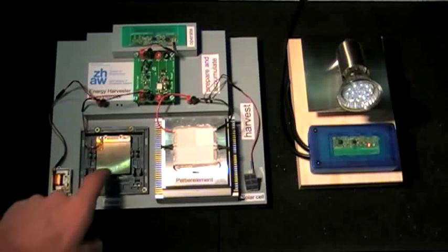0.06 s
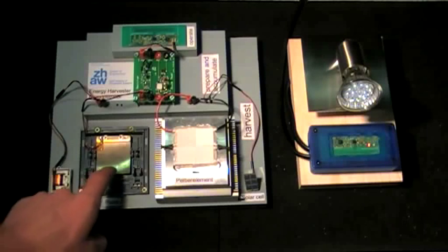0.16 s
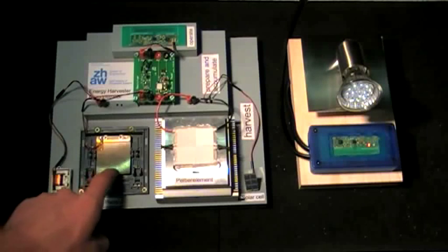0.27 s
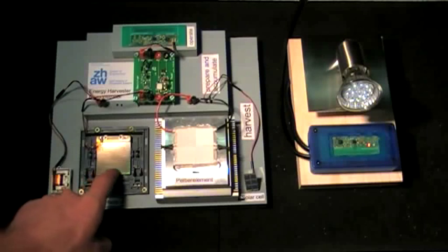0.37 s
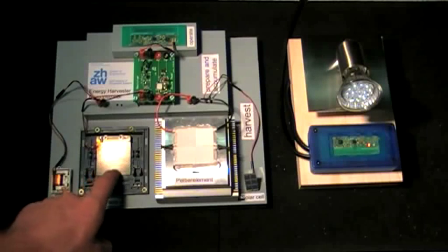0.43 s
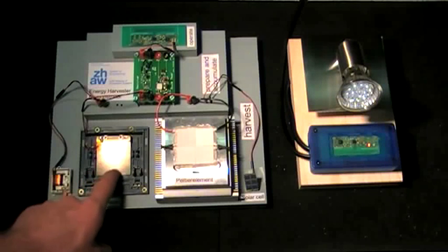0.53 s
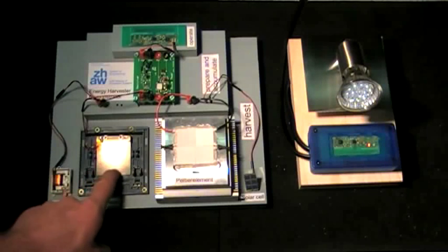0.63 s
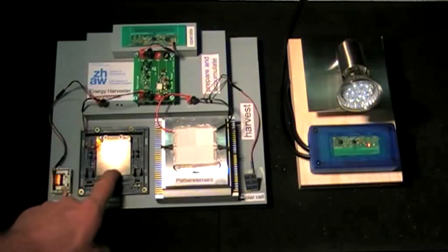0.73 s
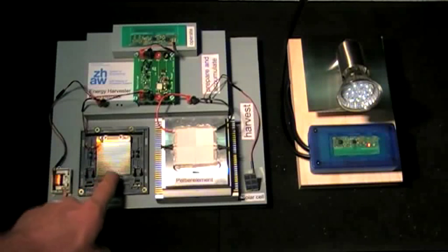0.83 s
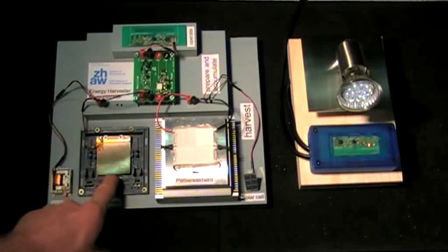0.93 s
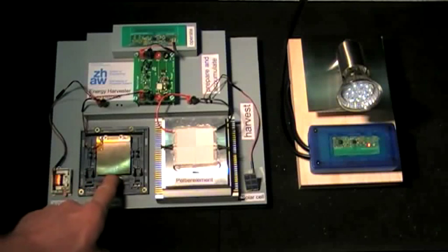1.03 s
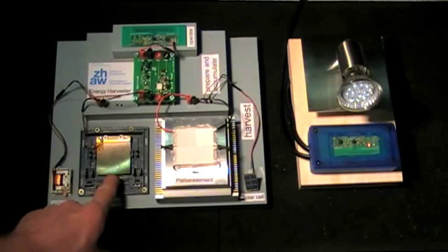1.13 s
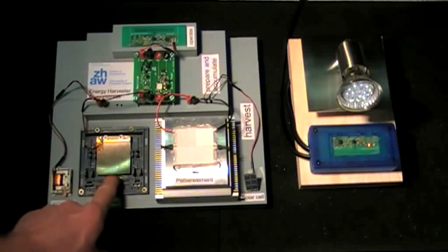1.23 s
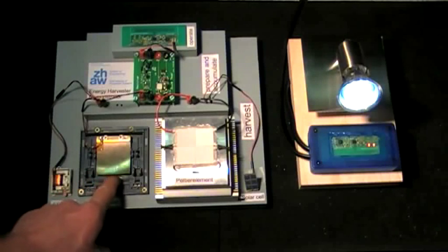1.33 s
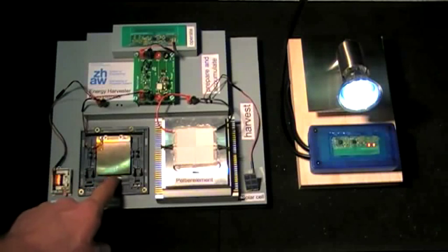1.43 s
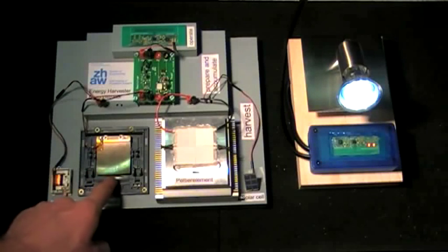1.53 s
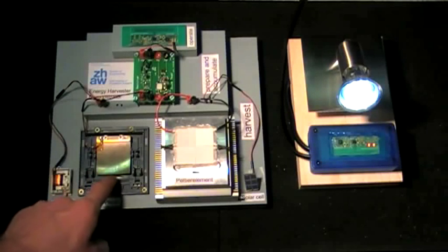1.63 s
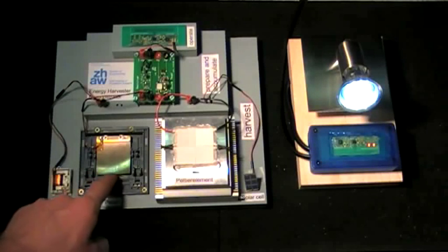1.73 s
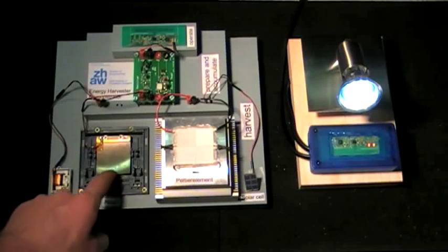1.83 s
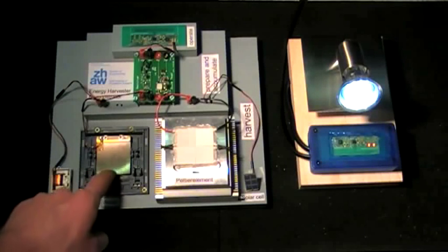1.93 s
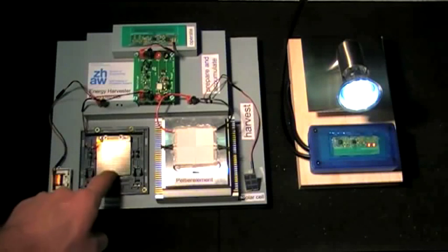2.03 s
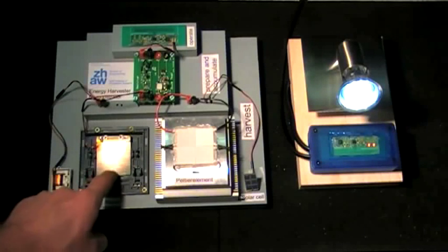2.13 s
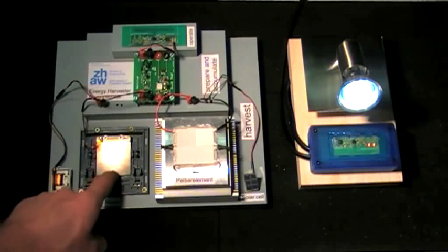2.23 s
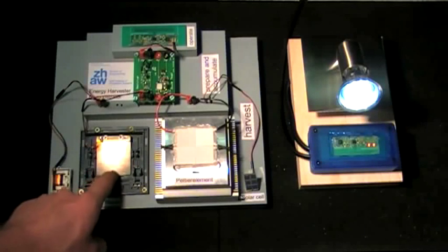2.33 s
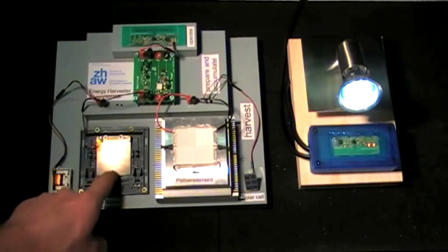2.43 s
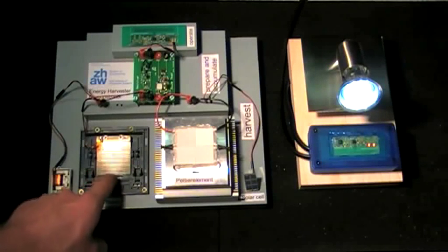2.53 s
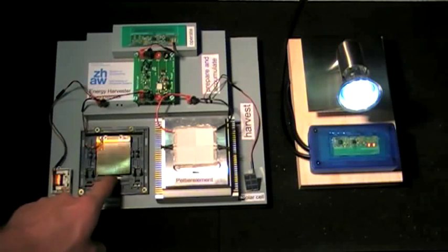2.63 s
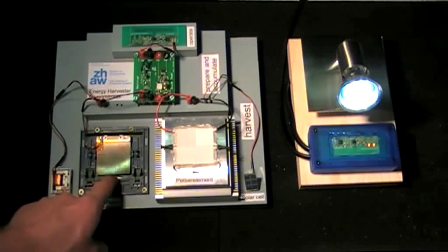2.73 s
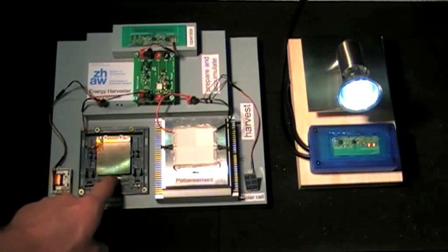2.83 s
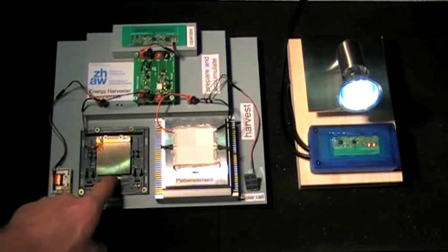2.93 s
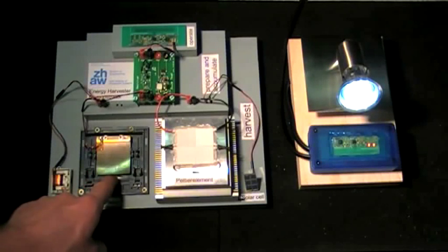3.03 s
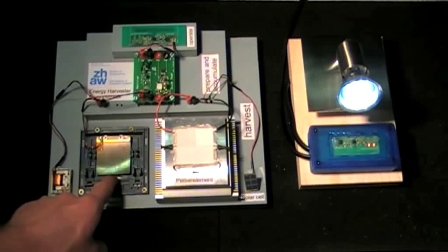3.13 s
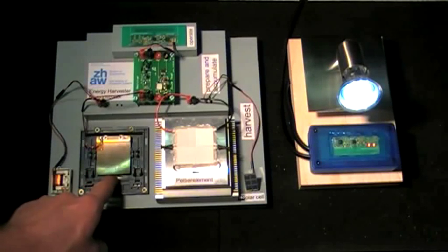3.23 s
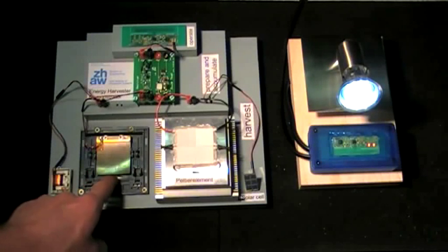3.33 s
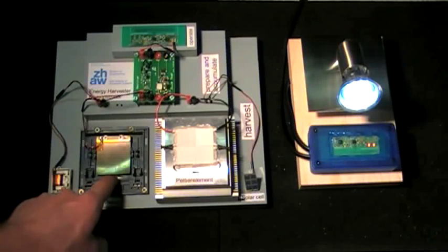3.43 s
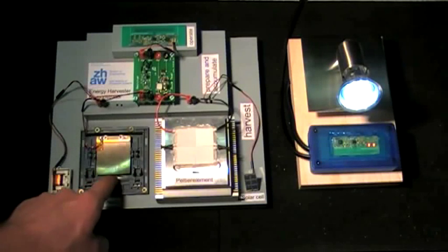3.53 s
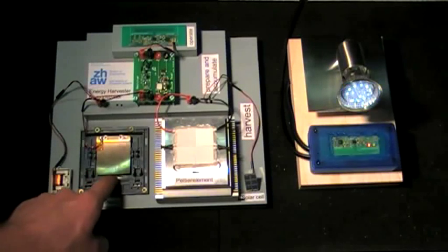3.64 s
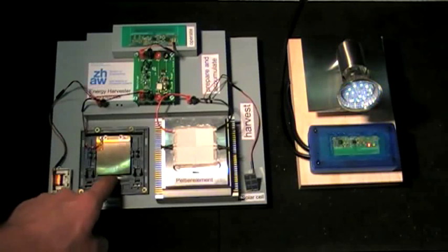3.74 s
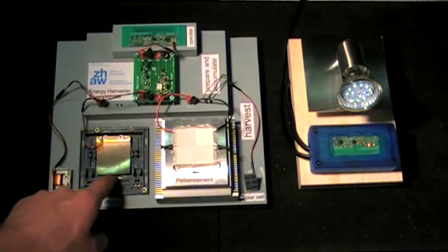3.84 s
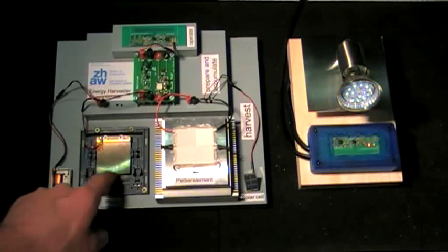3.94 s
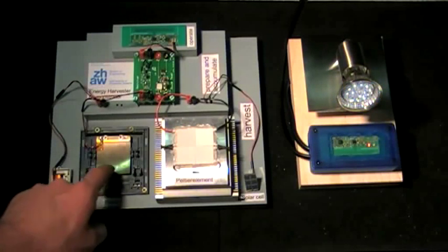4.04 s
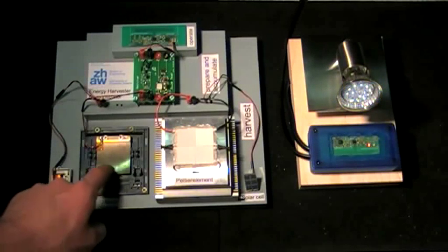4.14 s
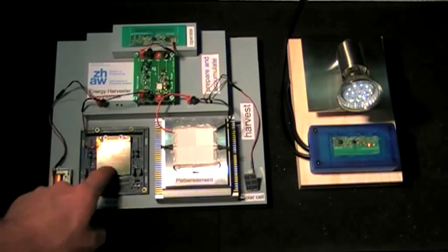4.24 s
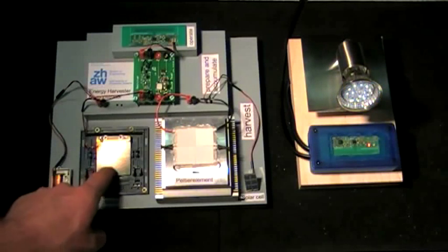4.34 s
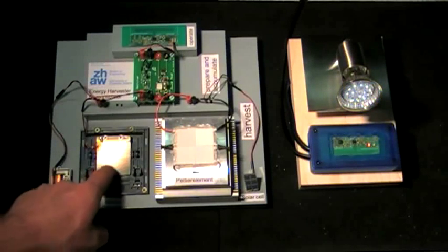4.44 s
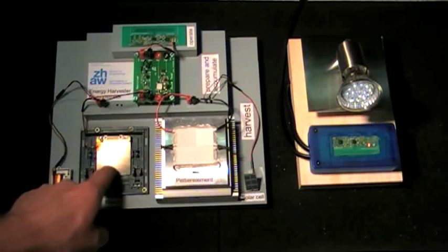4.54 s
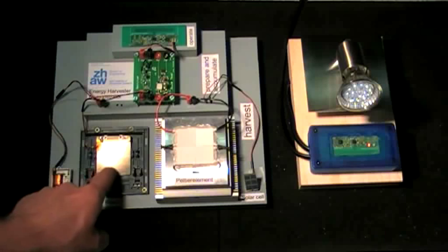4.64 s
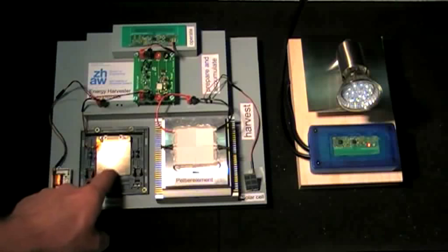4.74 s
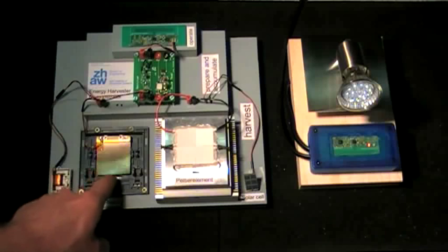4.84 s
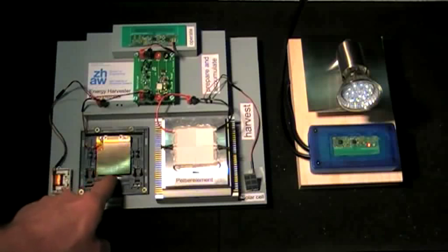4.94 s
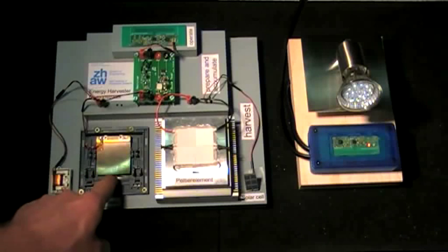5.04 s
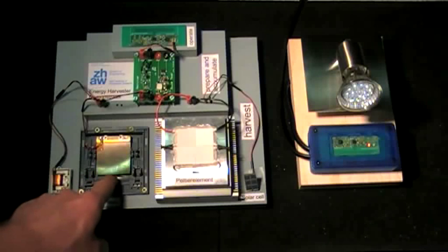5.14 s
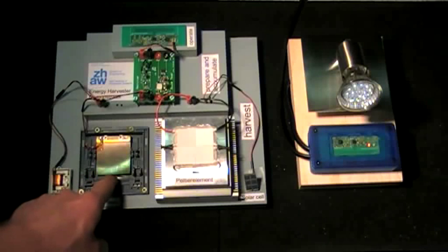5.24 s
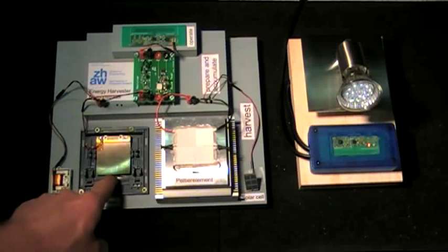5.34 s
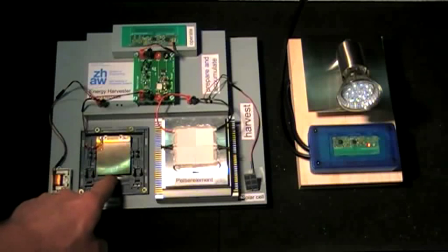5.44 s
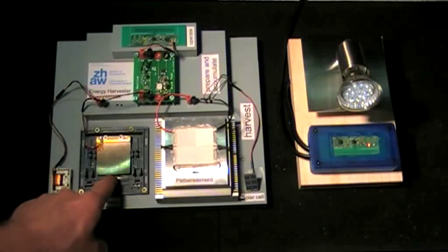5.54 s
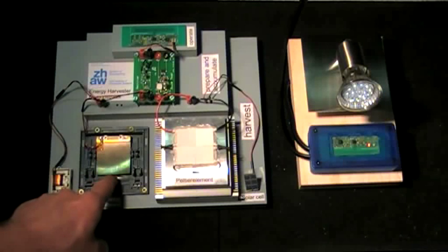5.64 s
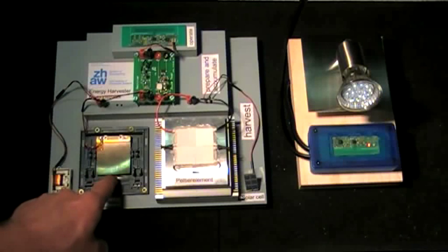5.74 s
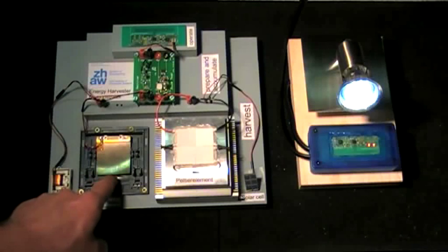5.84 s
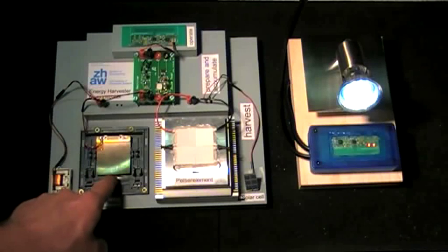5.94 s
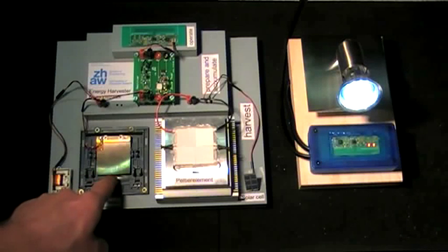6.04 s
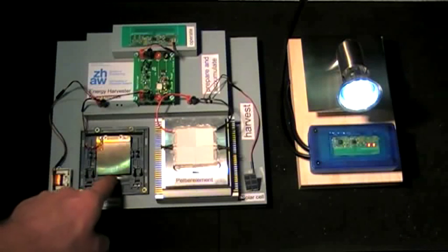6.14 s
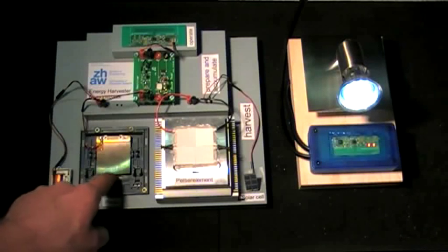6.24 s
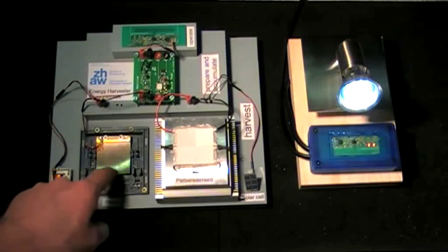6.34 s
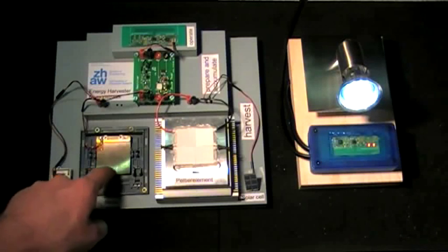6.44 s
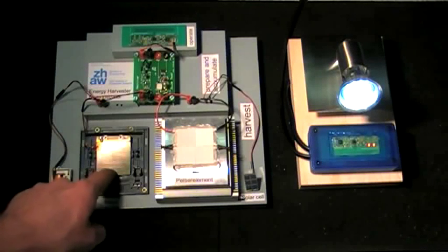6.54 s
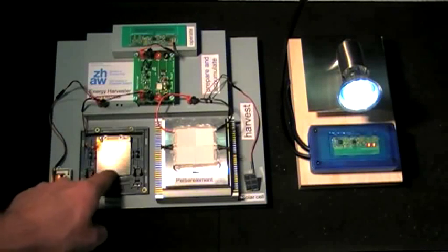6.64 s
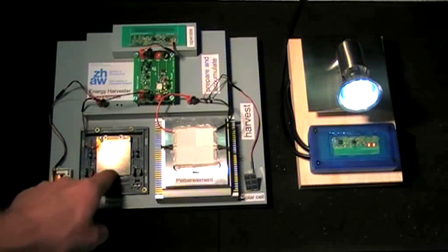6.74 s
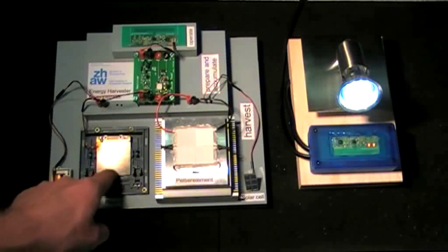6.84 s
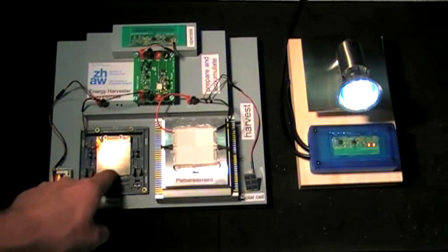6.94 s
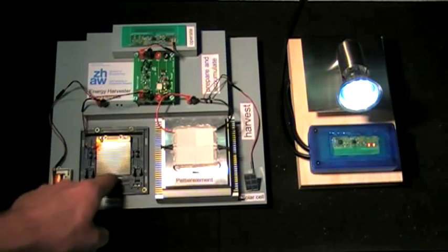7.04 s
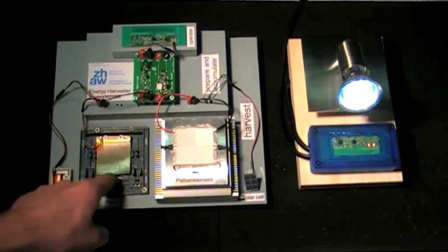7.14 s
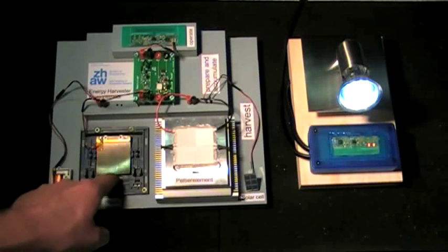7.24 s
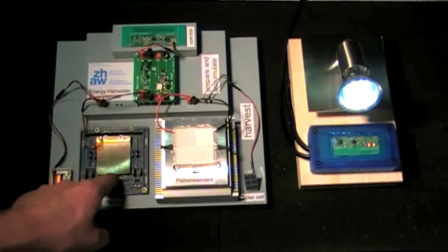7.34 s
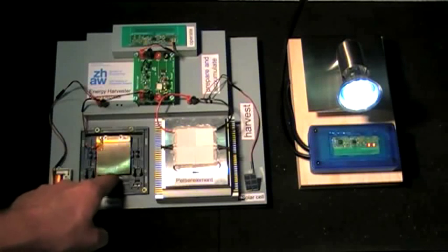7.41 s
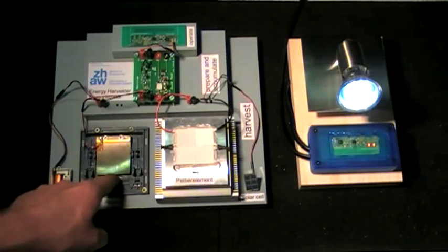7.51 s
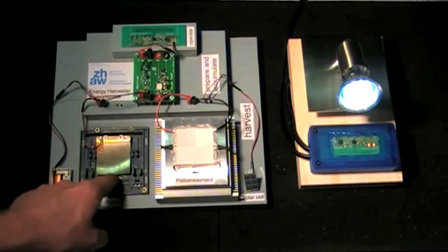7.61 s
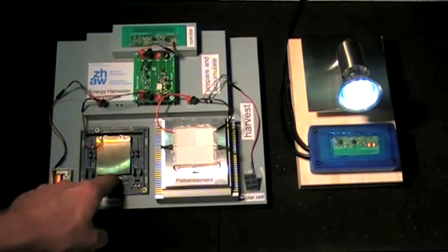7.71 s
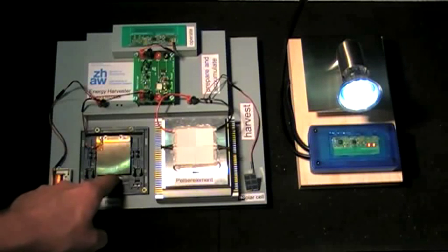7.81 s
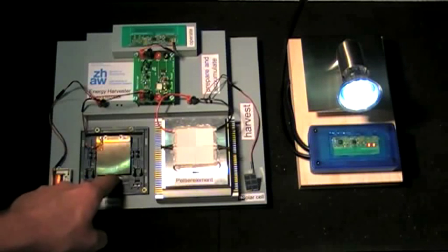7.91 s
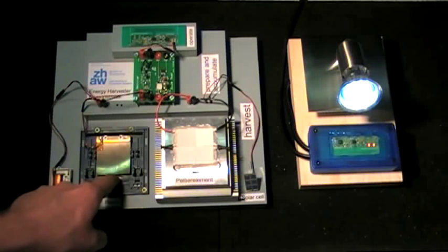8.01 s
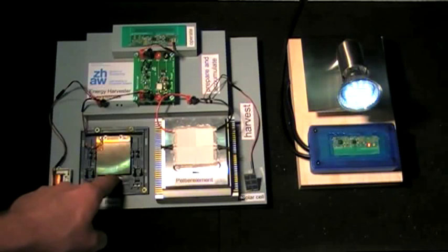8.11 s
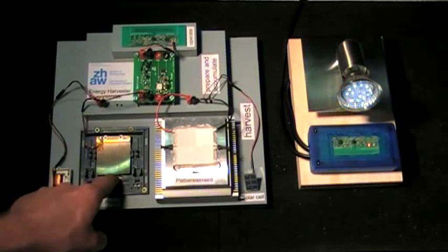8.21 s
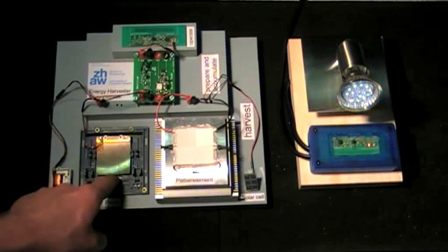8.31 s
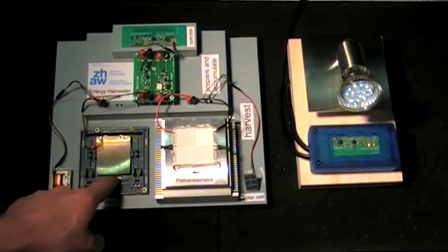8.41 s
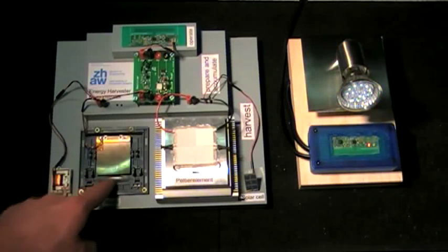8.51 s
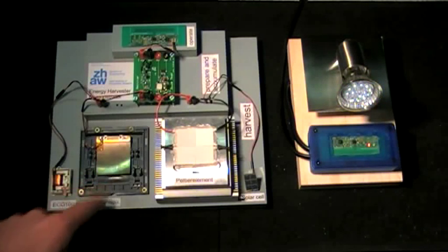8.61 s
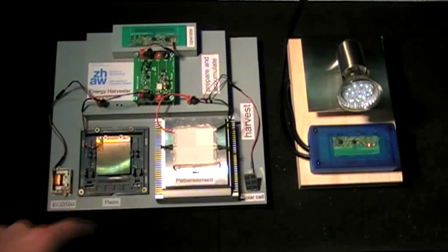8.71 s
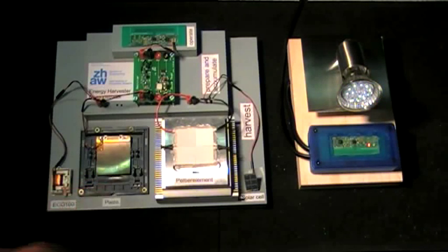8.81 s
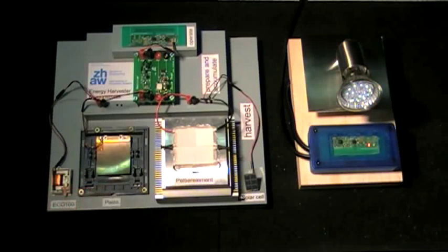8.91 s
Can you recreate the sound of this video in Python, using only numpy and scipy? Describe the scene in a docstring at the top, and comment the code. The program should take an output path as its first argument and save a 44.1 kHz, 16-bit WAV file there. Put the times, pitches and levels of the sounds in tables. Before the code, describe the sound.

Close, in a quiet lab, a small switch on a board snaps loudly four times, a little over two seconds apart. Each is a hard, bright metallic crack with a short room echo. Between them come small plastic lever ticks, faint fingertip rubs and one soft bench knock. Low ventilation, a fading motor drone and faint mains hum lie beneath.

```python
"""A piezo snap switch on a demonstration board, straight ahead in a quiet lab, snaps four times under a finger.
Each snap is a set of decaying bar modes, a noise crack and a board thud; between snaps the lever ticks
(struck modes), the fingertip rubs (shaped noise) and the bench is knocked softly. The lab echoes all but the rubs.
Around it: ventilation and a broad air noise that sinks, a small motor coasting down (sinking sines), mains hum,
thin electronic whines and faint whistles (sines). Gain control and a limiter hold down the peaks."""
import sys
import numpy as np
from scipy import signal
from scipy.fft import rfft, irfft, next_fast_len
from scipy.io import wavfile
from scipy.ndimage import uniform_filter1d, minimum_filter1d

SR = 44100
rng = np.random.default_rng(int(sys.argv[2]) if len(sys.argv) > 2 else 0)


def unload_audio(sound):
    """Save the sound as a 16-bit wav file, at the path given as the first command line argument."""
    columns = np.transpose(np.atleast_2d(sound))
    # keep every value between -1 and 1, then stretch to whole-number steps
    steps = np.round(np.clip(columns, -1, 1) * 32767)
    wavfile.write(sys.argv[1], SR, steps.astype(np.int16))


N = 395395
TIME = np.arange(N) / SR


def from_db(db):
    """Decibels to amplitude gain."""
    return np.exp(np.asarray(db) * np.log(10) / 20)


def rms_one(x):
    """Scale a sound to rms 1."""
    return x / np.sqrt(np.mean(x ** 2) + 1e-20)


def at_hz(points, hz):
    """Read a curve of (f/Hz, value) on a log-frequency axis."""
    f, value = np.transpose(points)
    return np.interp(np.log(hz + 1), np.log(f), value)


def add(track, s, sound):
    """Mix a sound into a track at time s."""
    start = int(s * SR)
    track[..., start:start + sound.shape[-1]] += sound[..., :N - start]


def low_cut(x, hz):
    """Small things radiate little bass."""
    return signal.sosfilt(signal.butter(2, hz, "high", fs=SR, output="sos"), x)


def flutter(length, size):
    """Chance that changes about every size samples; rms 1."""
    return rms_one(uniform_filter1d(rng.standard_normal(length), size=size))


def tone(hz, waver_hz):
    """A sine of rms 1 whose pitch wavers at random."""
    wavering_hz = hz + waver_hz * flutter(N, size=500)
    return np.sqrt(2) * np.sin(2 * np.pi * np.cumsum(wavering_hz) / SR)


def diffuse(spectrum, likeness, size=N):
    """Stereo noise from all around: a shared and an opposed part set how alike left and right are."""
    padded = next_fast_len(size)
    hz = np.arange(padded // 2 + 1) * SR / padded
    mid, side = rfft(rng.standard_normal((2, padded)))
    alike = np.clip(at_hz(likeness, hz), -.99, .99)
    shared = np.sqrt((1 + alike) / 2) * mid
    opposed = np.sqrt((1 - alike) / 2) * side * [[1], [-1]]
    return irfft((shared + opposed) * from_db(at_hz(spectrum, hz)), padded)[:, :size]


def ring(hz, db, t60, late=0, size=4096):
    """One struck mode: a sine that dies away by 60 dB in t60 seconds."""
    t = np.maximum(TIME[:size] - late, 0)
    return from_db(db - 60 * t / t60) * np.sin(2 * np.pi * hz * t)


def struck(modes, vary_db, detune):
    """A blow on a body; the contact point shifts strength and pitch of each mode. Peak 1."""
    sound = 0
    for k, (hz, db, t60) in enumerate(modes):
        strength, pitch = rng.standard_normal(2)
        sound = sound + (-1) ** k * ring(hz * (1 + detune * pitch), db + vary_db * strength, t60)
    return sound / np.abs(sound).max()


# left-right likeness of the air noise at the two channels: f/Hz, likeness [-1..1]
AIR_LIKENESS = [(60, -0.19), (130, -0.28), (270, -0.55), (560, -0.19), (1190, 0.1), (2510, 0.34),
                (5290, 0.94), (11200, -0.56)]
# colour of the ventilation noise: f/Hz, relative level/dB
VENT_COLOUR = [(18, -43.5), (30, -16.5), (91, -13), (114, -5.5), (222, -4), (338, 2), (443, -2), (782, -1),
               (1520, -5.5), (2050, -10), (3900, -15.5), (4520, -19), (7410, -19), (9250, -23),
               (11000, -45), (14300, -62), (22000, -120)]


def ventilation(level_db=-57.5):
    """Turbulent air all around the lab: steady coloured noise."""
    return from_db(level_db) * rms_one(diffuse(VENT_COLOUR, AIR_LIKENESS))


# colour of the sinking air noise: f/Hz, relative level/dB
SINKING_COLOUR = [(18, -50.5), (30, -22.5), (108, -5.5), (187, -6), (346, 4), (443, -1.5), (1720, -2),
                  (3360, -14.5), (7230, -15), (9250, -21.5), (11000, -54.5), (14300, -83), (22000, -120)]


def sinking_air(level_db=-52, hold_s=.85, halving_s=0.79):
    """A broad air noise that holds, then sinks, to half its amplitude after a further halving_s."""
    level = from_db(level_db) / (1 + np.maximum(TIME - hold_s, 0) / halving_s)
    return level * rms_one(diffuse(SINKING_COLOUR, AIR_LIKENESS))


# the motor's orders: multiple of the turning rate, level/dB
ORDERS = [(1, -8.5), (2, 0), (3, -4), (4, -6)]


def motor(turns_per_s=55.7, coast_s=9.8, level_db=-70.5, fall_db_per_s=3, stop_s=2.7, release_s=.25):
    """Friction slows the motor to 1/e of its rate in coast_s; its orders sink and fade."""
    turns = turns_per_s * np.exp(-TIME / coast_s)
    gate = np.clip((stop_s - TIME) / release_s, 0, 1)   # the orders are silent from stop_s on
    level = from_db(level_db - fall_db_per_s * TIME) * gate
    return level * sum(from_db(order_db) * tone(k * turns, waver_hz=1.5) for k, order_db in ORDERS)


# hum and two higher lines that last throughout: f/Hz, level/dB
HUM_LINES = [(119.6, -75.5), (780, -76.5), (9080, -85.5)]


def mains_hum():
    """Mains hum leaks in as sines of steady level with a slight pitch waver."""
    return sum(from_db(db) * tone(hz, waver_hz=0.59) for hz, db in HUM_LINES)


# colour of the crack of hard contacts: f/Hz, level/dB
CRACK_COLOUR = [(100, -20.5), (400, -9), (1100, -4), (3000, -1.5), (4400, -4), (6000, 1), (7600, 3),
                (9000, -6.5), (10500, -4)]
# its left-right likeness, held within +-0.99 when played: f/Hz, likeness
CRACK_WIDTH = [(200, -0.51), (1100, -0.67), (2000, 0.7), (6400, .85), (8000, 0), (10000, -1.2)]


def crack(t60, size=4096):
    """The many damped high modes of a hard contact: a burst of noise."""
    burst = rms_one(diffuse(CRACK_COLOUR, CRACK_WIDTH, size=size))
    return burst * from_db(-60 * TIME[:size] / t60)


# the switch snaps over: t/s, level/dB, brightness [dB per octave], board thud level/dB, thud f/Hz
SNAP_EVENTS = [(0.9383, 1.5, -5, -23, 680), (2.6313, 4, 4, -24, 336), (4.8901, 4.5, 1, -29.5, 520),
               (7.1423, 3.5, 2, -20.5, 316)]
# modes of the piezo bar and its housing: f/Hz, level/dB, t60/s, start after the snap t/s
BAR_MODES = [(487, -31.5, 0.017, 0.0013), (1010, -39, .023, 0), (1840, -26.5, .016, 0.00068),
             (2339, -23.5, 0.0031, 0.0013), (3310, -18, .009, 0.0058), (3970, -9.5, 0.018, 0.0019),
             (4677, 0, .0055, 0.0018), (5103, -4, 0.011, 0), (6460, -22, .007, .0004),
             (7435, -2, 0.0099, .0011), (7900, -13, .007, 0.000096), (8850, -20, .005, .0004),
             (9800, -20, 0.012, 0.0011)]


def snaps(pivot_hz=4500, crack_db=-10.5, crack_t60=0.025, thud_t60=0.01, slip_db=-31, slip_lead=0.0032, cut_hz=750):
    """The latch slips a little, then lets go: the bar cracks and rings, and the board thuds."""
    out = np.zeros((2, N))
    for s, level_db, tilt, thud_db, thud_hz in SNAP_EVENTS:
        bar = sum(ring(hz, db + tilt * np.log2(hz / pivot_hz), t60, late) for hz, db, t60, late in BAR_MODES)
        snap = from_db(level_db) * low_cut(bar + from_db(crack_db) * crack(crack_t60), cut_hz)
        slip = from_db(level_db + slip_db) * crack(2 * crack_t60)
        add(out, s - slip_lead, slip)
        add(out, s, snap + ring(thud_hz, thud_db, thud_t60))
    return out


# left-right likeness of the room and the rubs: f/Hz, likeness [-1..1]
ROOM_WIDTH = [(60, 0.095), (140, 0.61), (340, 0.59), (820, 1), (1950, 0.85), (6500, .98), (8300, -.1),
              (11200, -0.3)]
# near reflections from board and bench: f/Hz, level/dB
NEAR_COLOUR = [(300, -14.5), (1000, -5.5), (2500, -12), (4500, -8), (7500, -8), (10000, -8.5)]
# the room's tail: f/Hz, level/dB
TAIL_COLOUR = [(300, -10.5), (1000, -13.5), (2500, -13), (4500, -14), (7500, -15), (10000, -12.5)]
# decay of the tail by band: f/Hz, t60/s
TAIL_DECAY = [(500, 0.24), (1800, 0.47), (4800, 0.5415), (7500, .45), (10000, .35)]


def lab(x, near_t60=0.14, near_delay=0.004, tail_delay=0.011, size=32768):
    """Dense reflections from board and bench, then the room's tail, each band dying at its own rate."""
    t = TIME[:size]
    fade = (t > near_delay) * from_db(-60 * t / near_t60)
    response = diffuse(NEAR_COLOUR, ROOM_WIDTH, size=size) * fade / np.linalg.norm(fade)
    tail = rfft(diffuse(TAIL_COLOUR, ROOM_WIDTH, size=size))
    hz = np.arange(size // 2 + 1) * SR / size
    centres = [f for f, _ in TAIL_DECAY]
    for (_, t60), band in zip(TAIL_DECAY, np.eye(len(TAIL_DECAY))):
        weight = at_hz(list(zip(centres, band)), hz)   # overlapping bands that sum to one
        fade = np.clip(t / tail_delay - 1, 0, 1) * from_db(-60 * t / t60)
        response = response + irfft(tail * weight) * fade / np.linalg.norm(fade)
    return signal.oaconvolve(x[None], response, axes=1)[:, :N]


# light touches of the lever: t/s, frame level/dB, return spring level/dB
TICK_EVENTS = [(1.2231, -33, -41), (1.3737, -26.5, -22), (2.1526, -45.5, -61), (3.6554, -27.5, -30),
               (5.6405, -30, -40.5), (5.8264, -40, -50), (5.9109, -28.5, -23.5), (5.971, -37.5, -45),
               (6.1322, -37.5, -56), (6.2788, -46, -43.5), (6.3332, -53, -40.5), (6.6773, -44, -42.5),
               (7.913, -38, -44.5), (8.166, -27, -30.5), (8.196, -40.5, -49), (8.232, -45.5, -56.5),
               (8.3215, -37.5, -54.5), (8.5292, -45.5, -40.5)]
# modes of the plastic frame: f/Hz, level/dB, t60/s
FRAME_MODES = [(763, -19.5, 0.021), (1796.2, -9.5, 0.0084), (2484, -4, 0.015), (3244, -2, 0.0055),
               (4060, -4.5, 0.011745), (4930, -9.5, 0.01091), (7100, 6, 0.002196), (8320, -3.5, 0.003),
               (9790, -19, 0.026)]
# modes of the return spring: f/Hz, level/dB, t60/s
SPRING_MODES = [(5350, 0.5, 0.0093), (5800, 6, .005), (6550, 2.5, 0.0105), (7000, 8.5, .005)]


def ticks(graze_db=-13, bounce_db=-7, spacing=0.0034, crack_db=-9, crack_t60=0.0038):
    """The lever grazes, seats and bounces within a few milliseconds."""
    out = np.zeros((2, N))
    for s, frame_db, spring_db in TICK_EVENTS:
        before, after = spacing * rng.uniform(.7, 1.3, 2)
        for offset, db in ((-before, graze_db), (0, 0), (after, bounce_db)):
            frame = struck(FRAME_MODES, vary_db=2.5, detune=.03) + from_db(crack_db) * crack(crack_t60)
            spring = struck(SPRING_MODES, vary_db=2, detune=.01)
            touch = from_db(frame_db) * frame + from_db(spring_db) * spring
            add(out, s + offset, from_db(db) * touch)
    return out


# fingertip rubs: t/s, level/dB, length t/s, share of hiss [0-1]
RUB_EVENTS = [(2.286, -66, 0.21, 0.96), (3.761, -64.5, 0.084, 0), (4.242, -58.5, 0.11, .25),
              (4.5, -56, 0.16, 0.19), (4.776, -53, 0.17, 0.71), (5.295, -53.5, 0.094, 0.63),
              (5.486, -58.5, 0.12, 0.46), (5.989, -60, 0.34, 0.24), (6.807, -60, 0.21, 0.13)]
# colour of the rub's body: f/Hz, relative level/dB
BODY_COLOUR = [(700, -26), (1400, -2), (2000, 0), (3000, -6.5), (4500, -9.5), (9000, -36)]
# colour of the rub's hiss: f/Hz, relative level/dB
HISS_COLOUR = [(1500, -20), (4000, -11.5), (5600, 0), (7300, 0), (8500, -7), (11000, -26.5)]


def rubs(rise=0.0052, grain_db=1.5, size=16384):
    """Skin slides on plastic: a quick, grainy start that fades as the finger comes to rest."""
    out, t = np.zeros((2, N)), TIME[:size]
    for s, db, length, share in RUB_EVENTS:
        body = rms_one(diffuse(BODY_COLOUR, ROOM_WIDTH, size=size))
        hiss = rms_one(diffuse(HISS_COLOUR, ROOM_WIDTH, size=size))
        grain = from_db(db + grain_db * flutter(size, size=130))
        stroke = grain * np.minimum(t / rise, 1) * np.exp(-(t / length) ** 2)
        add(out, s, stroke * (np.sqrt(1 - share) * body + np.sqrt(share) * hiss))
    return out


# soft knocks on the bench: t/s, level/dB
KNOCK_EVENTS = [(2.988, -35), (3.045, -47)]
# modes of the bench: f/Hz, level/dB, t60/s
BENCH_MODES = [(186, -15, 0.081), (358, -13, 0.14), (484.98, -9.5, 0.031), (597.14, -10, 0.031),
               (895, -10, 0.022), (1262.6, -10.5, 0.02), (1780, -7, 0.02), (2560, -10, 0.014)]


def knocks(soft_hz=800, cut_hz=230, drag_db=-28, drag_s=0.068, pad_s=0.0011):
    """Padded blows on the bench; each swells briefly, drags a little and keeps the wood sounding."""
    out, t = np.zeros(N), TIME[:4096]
    for s, db in KNOCK_EVENTS:
        drag = from_db(drag_db) * rng.standard_normal(len(t)) * np.exp(-t / drag_s)
        contact = (t == 0) + drag   # one impulse and the drag
        wood = struck(BENCH_MODES, vary_db=1, detune=.01)
        swell = t / (t + pad_s)
        add(out, s, from_db(db) * signal.fftconvolve(contact, wood)[:len(t)] * swell)
    softened = signal.sosfilt(signal.butter(1, soft_hz, fs=SR, output="sos"), out)
    return low_cut(softened, cut_hz)


# faint whistles that arch up and back: t/s, length t/s, end f/Hz, top f/Hz, level/dB
WHISTLE_EVENTS = [(3.92, 0.32, 4400, 6500, -78), (6.66, 0.36, 4200, 5900, -81),
                  (3.93, 0.28, 1780, 1810, -70)]
# thin whines that come and go: t/s, length t/s, f/Hz, level/dB, swell [dB per s], pitch waver [Hz]
WHINE_EVENTS = [(4.382, 1.5, 7290, -65, -6.5, 38), (6.05, 0.52, 7150, -73, 0, 29.8),
                (6.118, 1.75, 7490, -74.5, 1.5, 22), (6.802, 1.06, 7080, -73.5, -2.5, 22)]


def whine(flicker_db=4, fade_s=.1):
    """Converters on the board sing thinly, each on its own unsteady pitch; a few whistles arch by."""
    out = np.zeros(N)
    for s, length, hz, db, swell, waver in WHINE_EVENTS:
        t = np.clip(TIME - s, 0, length)
        gate = np.clip(np.minimum(t, length - t) / fade_s, 0, 1)
        out += gate * from_db(db + swell * t) * tone(hz, waver_hz=waver)
    for s, length, end_hz, top_hz, db in WHISTLE_EVENTS:
        arch = np.sin(np.linspace(0, np.pi, int(length * SR), endpoint=False))
        phase = 2 * np.pi * np.cumsum(end_hz + (top_hz - end_hz) * arch) / SR
        add(out, s, from_db(db) * np.sqrt(2 * arch) * np.sin(phase))
    return out * from_db(flicker_db * flutter(N, size=1500))


def scene(air_balance_db=0.48):
    """The switch straight ahead with the room around it; air and motor lean slightly left."""
    switch = snaps() + ticks() + knocks()
    behind = ventilation() + sinking_air() + motor()
    behind = behind * from_db([[air_balance_db], [-air_balance_db]])
    return switch + lab(switch.mean(axis=0)) + rubs() + whine() + behind


def record(dry, threshold_db=-1, release_db_per_s=18, attack=0.0026, ceiling=.9, size=17, cutoff_hz=10700):
    """Gain control ducks after loud peaks, a fast limiter flattens them, hum leaks in, the top is cut."""
    peak = np.abs(dry).max(axis=0) + 1e-9
    over = np.maximum(20 * np.log10(peak) - threshold_db, 0)
    # the overshoot in dB is held and released at a constant rate
    release = release_db_per_s * TIME
    held = np.maximum.accumulate(over + release) - release
    r = np.exp(-1 / (attack * SR))
    duck = from_db(-signal.lfilter([1 - r], [1, -r], held))
    # the limiter holds the lowest gain of the neighbouring few samples, then smooths it
    lowest = minimum_filter1d(np.minimum(1, ceiling / (peak * duck)), size=size)
    limit = uniform_filter1d(lowest, size=size)
    top_cut = signal.ellip(8, .1, 50, cutoff_hz, fs=SR, output="sos")
    return signal.sosfiltfilt(top_cut, dry * duck * limit + mains_hum())


dry = scene()
out = record(dry)
unload_audio(out)
```